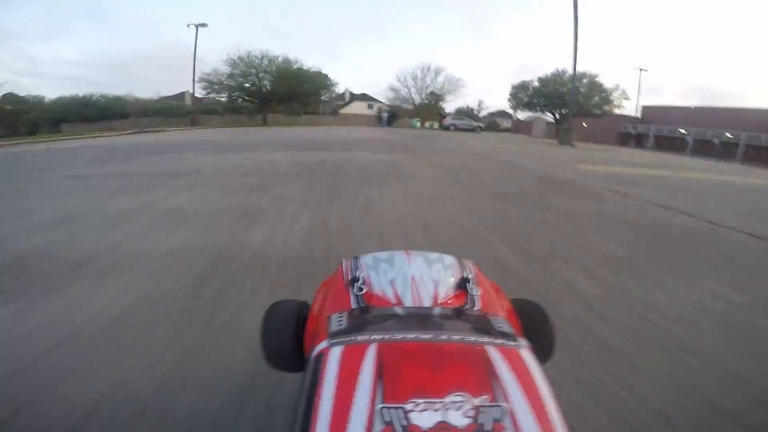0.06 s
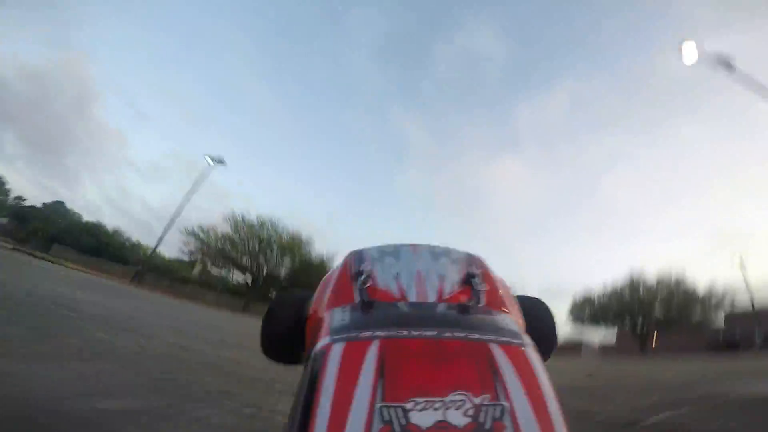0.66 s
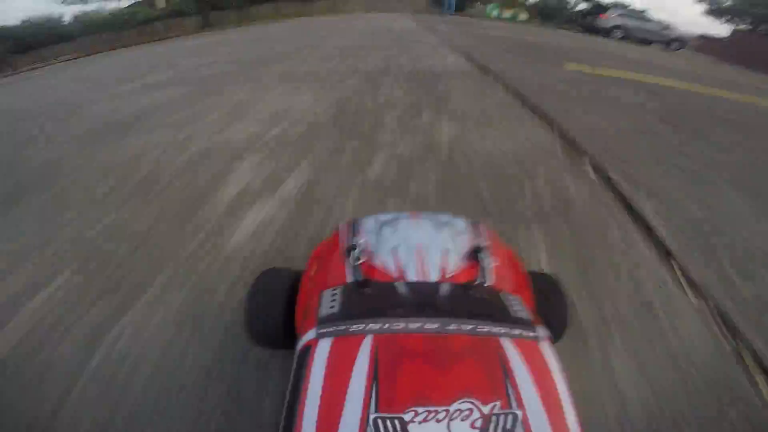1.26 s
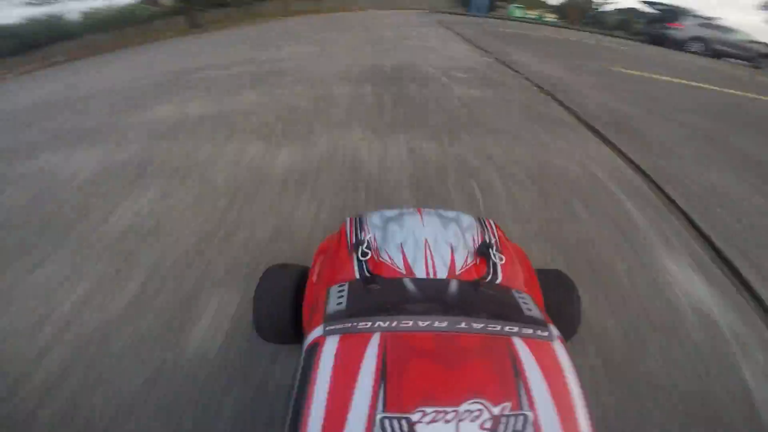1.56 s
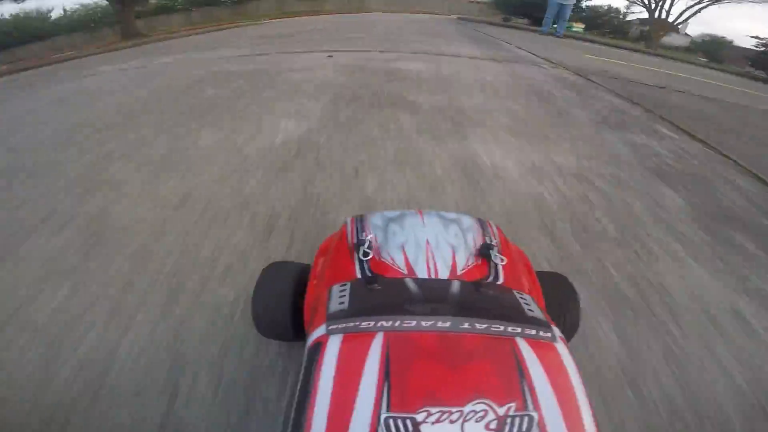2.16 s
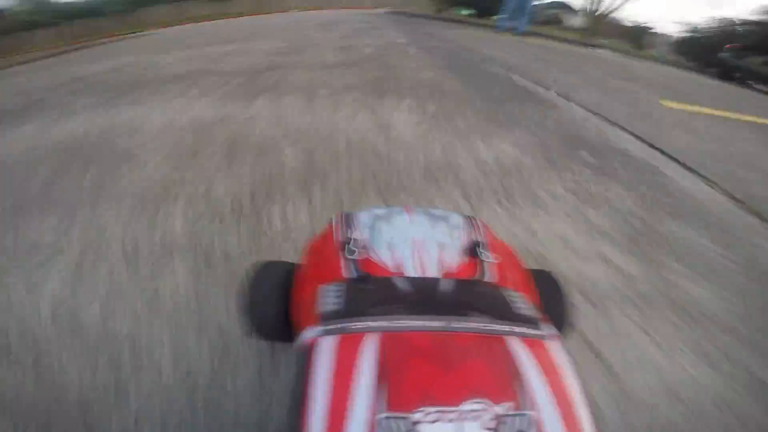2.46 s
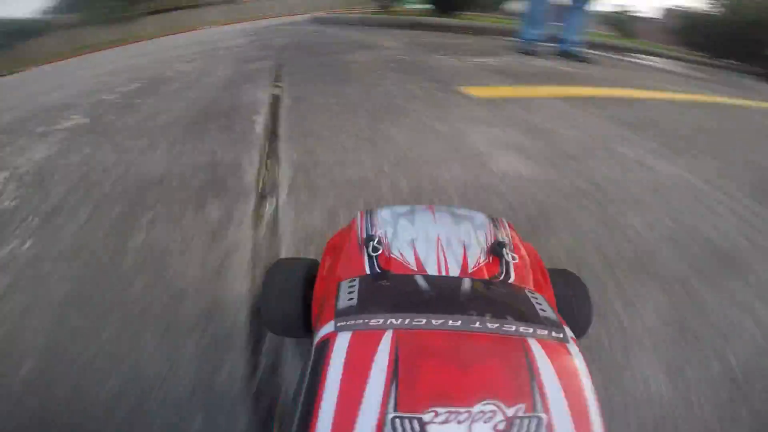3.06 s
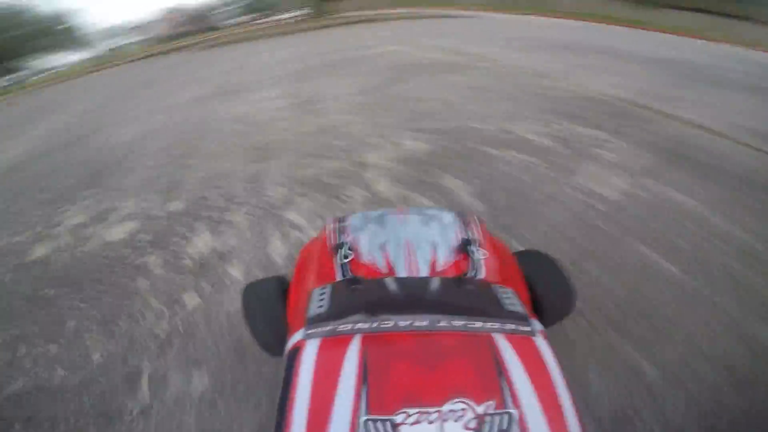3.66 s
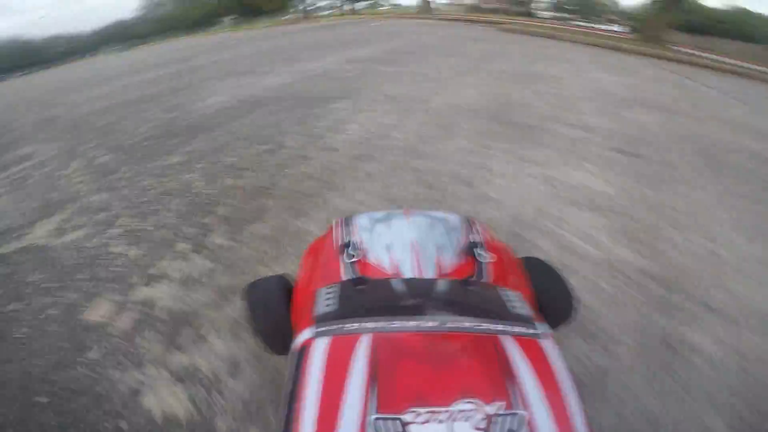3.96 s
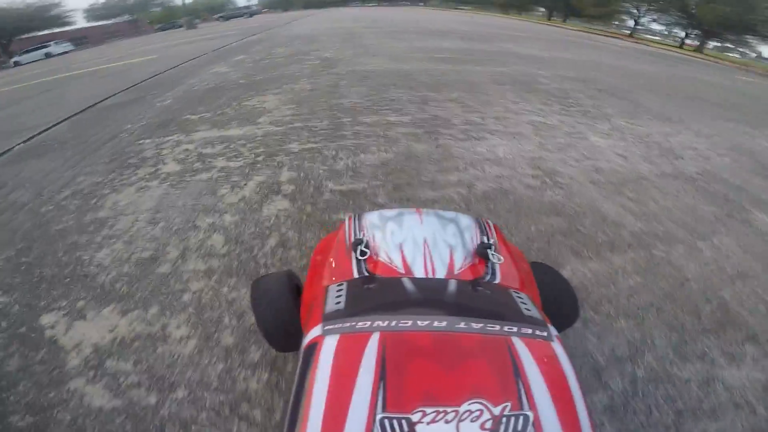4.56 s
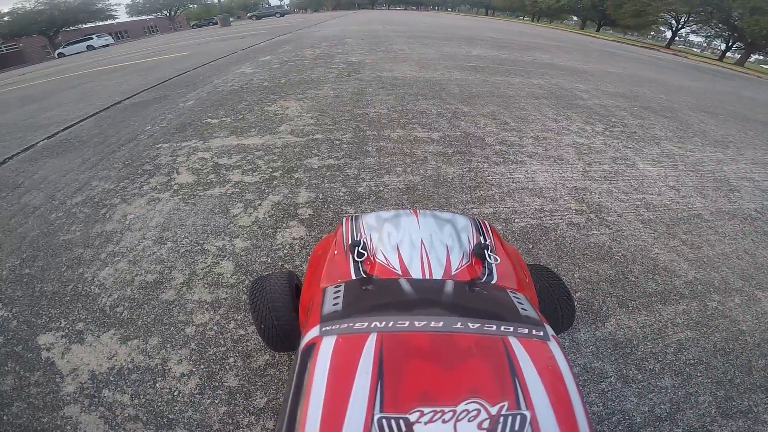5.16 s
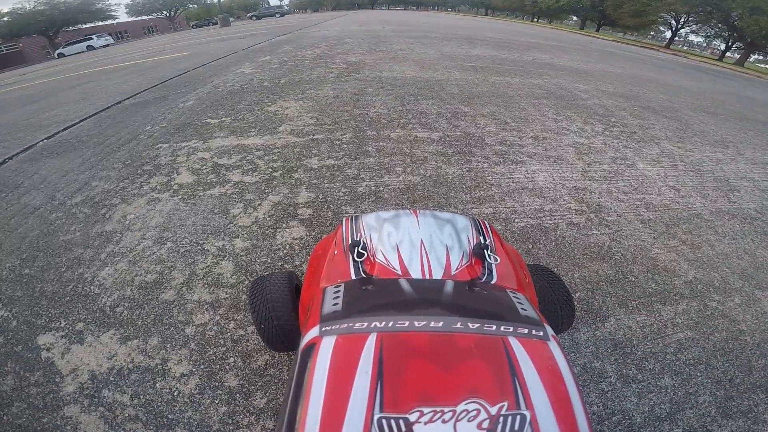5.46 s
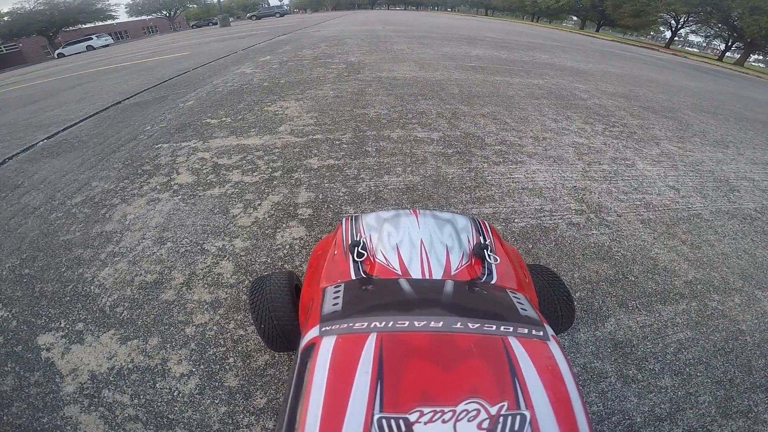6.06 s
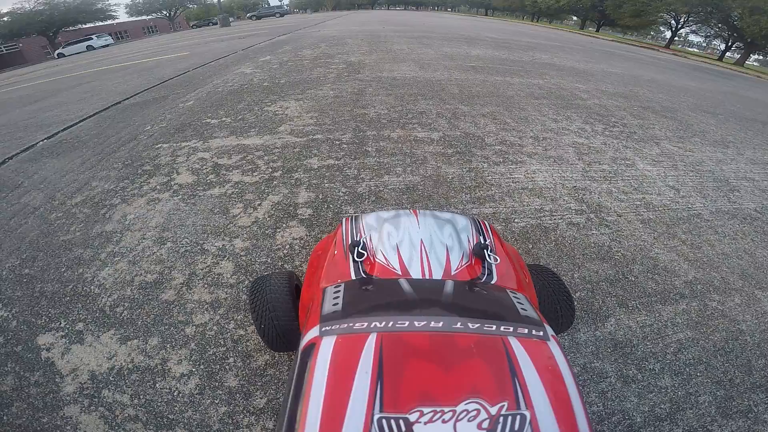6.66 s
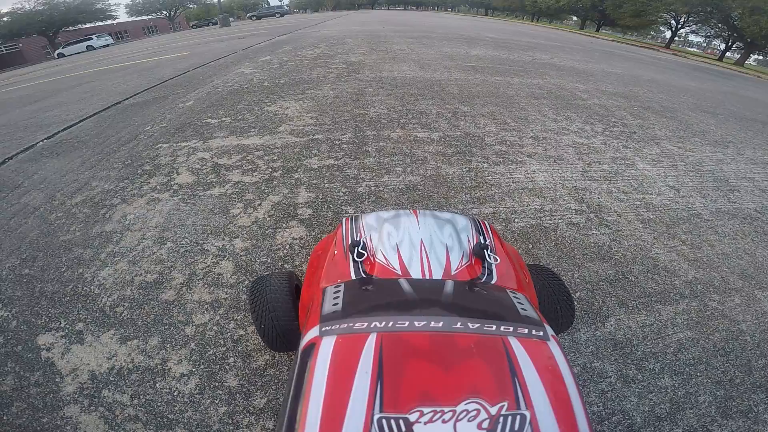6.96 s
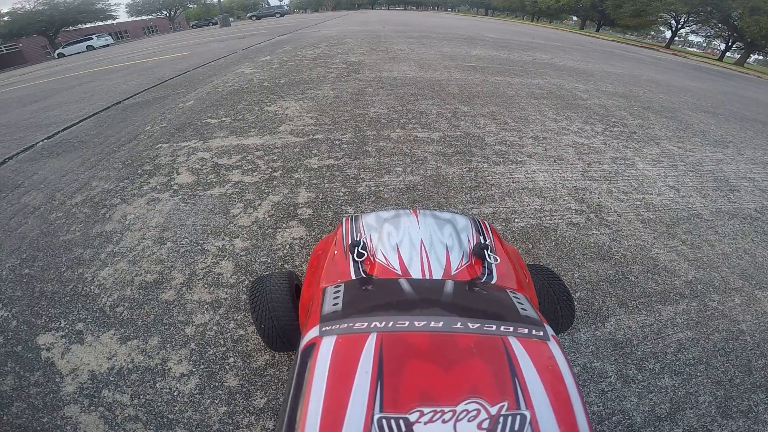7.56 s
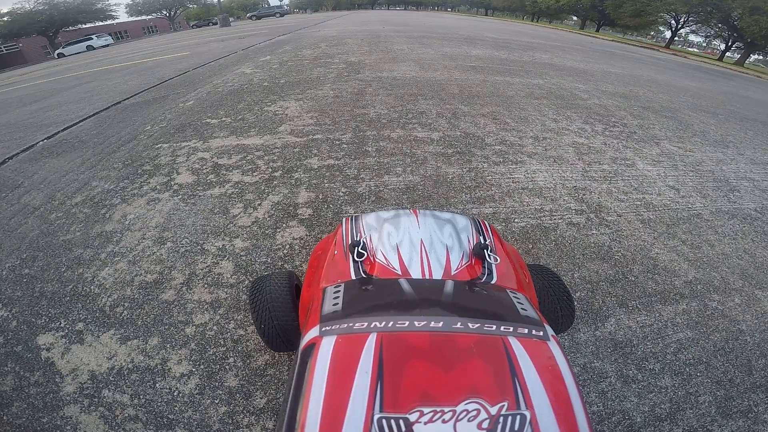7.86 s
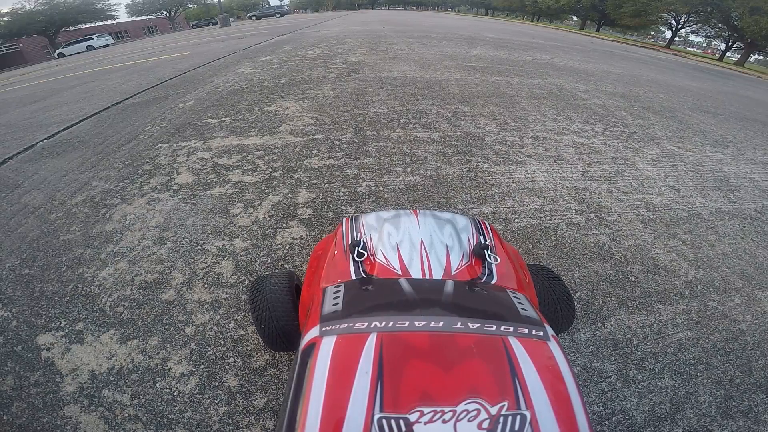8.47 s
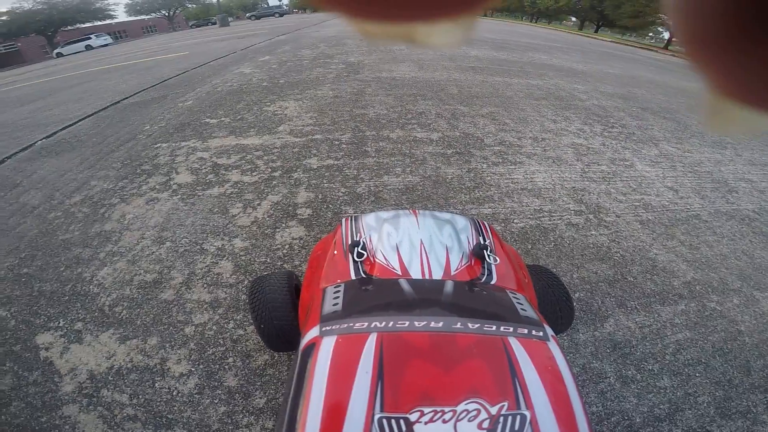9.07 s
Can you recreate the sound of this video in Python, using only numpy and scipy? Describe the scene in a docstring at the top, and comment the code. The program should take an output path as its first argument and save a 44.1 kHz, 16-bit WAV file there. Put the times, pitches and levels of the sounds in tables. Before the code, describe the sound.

A small electric radio-controlled truck is at full throttle on rough concrete, heard close from a microphone riding on it. Its gear whine surges to a peak around 0.4 seconds, with sharp clacks and a rattling plastic shell, and it lands with a thump at 0.9. The whine then falls steadily as the truck slows, over tyre rumble and a thin, steady electronic whistle. It judders around 2 seconds and thumps over paving joints, mostly between 2.5 and 3.8. The steering motor buzzes just after 4 seconds, and slack gears clack quickly from 4.4 until the truck stops at 5. After that it is much quieter: a small cooling fan sings a steady high tone over a faint steering buzz and soft air. From 9 to 9.3 seconds, fingers knock and rub against the microphone.

```python
"""A small electric truck revs into a wheelie on rough concrete, lands and slows to a halt.
Its gears whine and its loose parts rattle, both ringing the plastic shell. The ground shakes the
tyres and springs, and the speed controller whistles. The steering motor (servo) buzzes and, at rest,
the cooling fan sings. At the end a hand knocks against the camera that rides on the truck."""
import sys
import numpy as np
from scipy import signal
from scipy.fft import rfft, irfft, next_fast_len
from scipy.io import wavfile
from scipy.ndimage import map_coordinates

SR = 44100
rng = np.random.default_rng(int(sys.argv[2]) if len(sys.argv) > 2 else 0)


def unload_wav(signal):
    """Save mono or channel-first audio to the path in sys.argv[1] as 16-bit WAV at rate SR, clipped to [-1, 1]."""
    wavfile.write(
        sys.argv[1],
        SR,
        np.round(np.clip(np.atleast_2d(signal).T, -1, 1) * 32767).astype(np.int16),
    )


N = 410571
TIME = np.arange(N) / SR
CRUISE_HZ = 100  # a typical motor speed, in turns a second

# pitches at which the plastic shell rings: (pitch [Hz], width [Hz], level [dB])
SHELL = [(935.5, 280, -4.5), (1238, 370, -2.5), (1541, 140, -4.5), (1850, 217, -1), (2211, 408, 2.5),
         (2744, 420, -11.5), (3400, 42, -24), (3728, 200, -14), (4140, 570, -16.5), (5070, 170, -24),
         (5390, 400, -35), (6350, 640, -41), (7230, 310, -40), (7800, 610, -41), (8800, 280, -53),
         (9880, 680, -44), (11600, 1200, -65.5)]
# pitches at which the truck bounces on its springs: (pitch [Hz], width [Hz], level [dB])
SPRINGS = [(27.8, 27.6, -2.5), (61.7, 18.7, -1.5)]
# pitches at which the tyres boom: (pitch [Hz], width [Hz], level [dB])
TYRES = [(148, 47, -3.5), (181, 120, -5), (244.3, 49, 3), (385, 340, -14), (104, 24, -7.5)]

# stages of the run: (start [s], end [s], fade [s])
SPRINT = (-0.1, 0.29, 0.15)  # full throttle on all four wheels
WHEELIE = (0.32, 1, 0.16)  # nose in the air
TAIL_STAND = (0.438, 0.611, 0.039)  # upright, the tail drags on the ground


def amp(db):
    """Turn decibels into a gain, the number a sound is multiplied by."""
    return 10 ** (np.asarray(db) / 20)


def unit(x):
    """Scale a sound to an average strength (rms) of 1."""
    return x / np.sqrt(np.mean(x ** 2) + 1e-20)


def curves(rows):
    """Join a table's rows with straight lines: one curve for each column after the time."""
    times, *columns = np.transpose(rows)
    return [np.interp(TIME, times, column) for column in columns]


def wobble(rate):
    """A smooth random curve that takes `rate` new values a second."""
    return map_coordinates(rng.standard_normal(int(N * rate / SR) + 4), [TIME * rate])


def turns(hz):
    """The growing angle of something that spins hz times a second."""
    return 2 * np.pi * np.cumsum(hz) / SR


def tone(angle):
    """A pure tone with an average strength of 1."""
    return np.sqrt(2) * np.sin(angle)


def slopes(points):
    """A filter shape drawn through (pitch [Hz], level [dB]) points."""
    pitches, db = np.transpose(points)
    return lambda hz: amp(np.interp(np.log(hz + 1), np.log(pitches), db))


def body(modes):
    """The filter shape of an object: one peak for each pitch at which it rings."""
    return lambda hz: np.sqrt(sum((amp(db) / (1 + (2 * (hz - pitch) / width) ** 2)) ** 2
                                  for pitch, width, db in modes))


def colour(x, shape):
    """Filter a sound with the given shape, so that ringing follows each blow."""
    size = 2 * next_fast_len(len(x) // 2 + 4096)
    gain = np.maximum(shape(np.fft.rfftfreq(size, 1 / SR)), 1e-6)
    cepstrum = irfft(np.log(gain))
    cepstrum[1:size // 2] *= 2  # move all ringing to after the blow
    cepstrum[size // 2 + 1:] = 0
    return irfft(rfft(x, size) * np.exp(rfft(cepstrum)), size)[:len(x)]


def band(x, low_hz, high_hz):
    """Keep the part of a sound between two pitches."""
    edges = [low_hz, min(high_hz, 0.49 * SR)]
    return signal.sosfilt(signal.butter(5, edges, "band", fs=SR, output="sos"), x)


def noise(shape):
    """Steady noise filtered with the given shape."""
    return colour(rng.standard_normal(N), shape)


def burst(fade_s):
    """A short contact: noise that falls by 60 dB in fade_s."""
    t = np.arange(SR // 4) / SR
    return rng.standard_normal(len(t)) * amp(-60 * t / fade_s)


def push(rise_s):
    """One shove and its rebound."""
    progress = np.arange(SR // 4) / SR / rise_s
    return progress * (2 - progress) * np.exp(-progress)


def add(track, s, db, sound):
    """Lay a sound into the track at time s with the given peak level."""
    room = track[round(s * SR):][:len(sound)]
    room += amp(db) * sound[:len(room)] / np.abs(sound).max()


def during(start, end, fade):
    """1 inside a stage of the run, fading to 0 outside; times are in seconds."""
    return np.clip(np.minimum(TIME - start, end - TIME) / fade + 0.5, 0, 1)


def swell(s, db, half_length_s):
    """A gain that rises and falls once around time s."""
    return amp(db) * np.exp(-((TIME - s) / half_length_s) ** 2)


def rolling(speed, db, knee_hz, halving_db):
    """A gain that is steady at speed; well below knee_hz it loses halving_db as the speed halves."""
    return amp(db - halving_db * np.log2(np.hypot(1, knee_hz / (speed + 1e-3))))


def judder(speed, worst_hz=75, width_hz=6):
    """How hard the axles shake, from 0 to 1: they resonate around one motor speed."""
    return np.exp(-((speed - worst_hz) / width_hz) ** 2)


def gears(speed, shaft, wheel):
    """Teeth meet in a whine that rings the shell; slack and off-centre gears make it rough."""
    # force on the gear teeth: (time [s], level [dB])
    load = [(0, 7.5), (.25, 3.5), (.275, -5), (.55, 0), (.7, -8), (1.05, -6.5), (1.4, 0), (2.1, -3),
            (2.6, -6), (3.1, -2.5), (3.4, -4.5), (3.7, -8), (4.15, -1), (4.35, -7), (4.95, -44)]
    # tones of the pinion, the small gear at the axle: (cycles per motor turn, level [dB])
    pinion_tones = [(13, -21), (26, -24.5), (39, -25.5)]
    # tones of the spur gear, which the motor drives: (cycles per motor turn, level [dB])
    spur_tones = [(58, -20), (116, -31.5)]

    def whine(tones, angle):
        return sum(amp(db + 2.3 * wobble(45) + 2.2 * wobble(220)) * tone(round(cycles) * angle)
                   for cycles, db in tones)

    load_db, = curves(load)
    braking = during(3.22, 4.17, fade=0.2)  # the motor holds the truck back
    spur_db = load_db - 1 - 7 * during(*SPRINT) + 6 * braking + 4 * judder(speed)
    slack = 0.026 * wobble(60) + 0.008 * wobble(400)
    pinion_slack = slack + 0.016 * wobble(130)  # the pinion is the looser gear
    pinion = amp(load_db) * whine(pinion_tones, shaft + pinion_slack)
    pinion *= 1 + 0.14 * np.sin(2 * wheel) + 0.25 * np.sin(shaft)
    spur = amp(spur_db) * whine(spur_tones, shaft + slack) * (1 + 0.69 * np.sin(shaft))
    ringing = colour(pinion + spur, body(SHELL))
    return band(ringing, 830, 15000)  # a small shell hardly gives off low tones


def unbalance(speed, shaft, wheel):
    """Lopsided spinning parts hum through the springs and tyres, harder with speed."""
    doublings = np.log2((speed + 1e-3) / CRUISE_HZ)
    sprint, wheelie, shaking = during(*SPRINT), during(*WHEELIE), judder(speed)

    def hum(angle, db, doubling_db, sprint_db, wheelie_db, judder_db, waver_db):
        stage_db = sprint_db * sprint + wheelie_db * wheelie + judder_db * shaking
        return amp(db + doubling_db * doublings + stage_db + waver_db * wobble(25)) * tone(angle)

    rotor = hum(shaft, db=-46, doubling_db=12.5, sprint_db=-3.5, wheelie_db=9, judder_db=2, waver_db=3)
    wheels = hum(2 * wheel, db=-31, doubling_db=7,
                 sprint_db=7.5, wheelie_db=-5.5, judder_db=12, waver_db=3.5)
    joint = hum(2 * shaft + 0.15 * wobble(36), db=-31.5, doubling_db=7,  # it kicks twice a turn
                sprint_db=-0.5, wheelie_db=-14, judder_db=5, waver_db=0)
    return colour(rotor + wheels + joint, body(SPRINGS + TYRES))


def rattle(speed, wheel):
    """Many tiny hits ring the shell, bunched twice a wheel turn by the axle joints."""
    # noise bands of loose parts and tread: (low [Hz], high [Hz], level [dB], knee speed [turns/s],
    # loss per halving of speed [dB], change in sprint [dB], in wheelie [dB], in tail stand [dB])
    bands = [(710, 1694, -22, 6.4, 7.5, -4.5, -3, 5), (1621, 2530, -18.5, 21, 4.5, -2, -2, 1),
             (2508, 3440, -30, 17, 6.5, 1, 1.5, 8), (3477, 5900, -33.5, 26.3, 9, 6, -2, 2),
             (5840, 12700, -46.5, 42, 11.5, 4, -1.5, -0.5)]
    sprint, wheelie, tail = during(*SPRINT), during(*WHEELIE), during(*TAIL_STAND)
    depth = 0.11 + 0.46 * judder(speed)
    bunching = np.exp(depth * np.sin(2 * wheel)) / np.sqrt(np.i0(2 * depth))  # same average power
    uneven_db = 0.72 + 4 * np.exp(-speed / 22) + 1.2 * wheelie  # more uneven at a crawl
    strength = bunching * amp(uneven_db * wobble(90))
    hits_per_s = np.interp(speed, [10, 52], [700, 1900])
    hits = (rng.random(N) < hits_per_s / SR) * rng.choice([-1, 1], N)
    hits = hits * amp(rng.standard_normal(N)) / np.sqrt(hits_per_s)
    ringing = colour(strength * (unit(hits) + 0.67 * rng.standard_normal(N)), body(SHELL))
    parts = np.zeros(N)
    for low_hz, high_hz, db, knee_hz, halving_db, sprint_db, wheelie_db, tail_db in bands:
        stage = amp(sprint_db * sprint + wheelie_db * wheelie + tail_db * tail)
        parts += rolling(speed, db, knee_hz, halving_db) * stage * unit(band(ringing, low_hz, high_hz))
    # the rattle dips briefly as the wheels spin down before landing
    wheelie_lull = amp(-3.5 * during(0.68, 0.82, fade=0.31))
    return parts * wheelie_lull * rolling(speed, db=0.5, knee_hz=5.2, halving_db=9.5)


def chassis(speed):
    """Rough ground shakes the springs and tyres; joints in the paving thump them."""
    # wheels hit the joints: (time [s], spring peak [dB], tyre peak [dB])
    bumps = [(.239, -11.5, -5.5), (.59, -12.5, -11.5), (0.716, -17, -21), (0.897, -3, -13),
             (1.309, -8, -18), (1.345, -17, -22), (2.515, -7.5, -20), (2.552, -3.5, -15), (2.871, -12, -21),
             (3.059, -15, -16.5), (3.125, -14, -31.5), (3.191, -21, -14), (3.652, -6.5, -14.5),
             (3.76, -8.5, -18.5)]

    def lagging(gain, lag_s=0.05):  # the shaking lags behind the speed
        keep = np.exp(-1 / (lag_s * SR))
        return signal.lfilter([1 - keep], [1, -keep], gain, zi=[gain[0]])[0]

    def rumble(modes, top_hz):
        return unit(band(noise(body(modes)), 15.6, top_hz))

    spring_shake = lagging(rolling(speed, db=-22.5, knee_hz=17, halving_db=5.1))
    last_sway = swell(5.1, db=-38.5, half_length_s=0.17)  # it rocks once more at the halt
    springs = (spring_shake + last_sway) * rumble(SPRINGS, top_hz=400)
    tyres = lagging(rolling(speed, db=-32, knee_hz=5.8, halving_db=4.4)) * rumble(TYRES, top_hz=745)
    strain = amp(-27.5) * during(*SPRINT) + amp(-27) * during(*WHEELIE) + amp(-28) * during(*TAIL_STAND)
    drumming = strain * rumble(TYRES, top_hz=144.5)  # the rear tyres bear the whole truck
    thumps = np.zeros(N)
    for s, spring_db, tyre_db in bumps:
        add(thumps, s, spring_db, colour(push(rise_s=0.0017), body(SPRINGS)))
        add(thumps, s, tyre_db, band(colour(burst(fade_s=0.11), body(TYRES)), 60, 344))
    return springs + tyres + drumming + thumps


def controller(switch_hz=1008):
    """The speed controller switches the current on and off, so the motor's coils whistle."""
    # loudness of the whistle: (time [s], level [dB])
    throttle = [(0, -36), (.3, -39), (.8, -34), (1, -29), (3.2, -27.5), (4.2, -33), (4.6, -35.5),
                (4.85, -41), (5, -71)]
    # its tones: (multiple of the switching rate, relative level [dB])
    tones = [(2, 1), (3, -13.5), (4, -21)]
    level_db, = curves(throttle)
    angle = 2 * np.pi * switch_hz * TIME
    return sum(amp(level_db + db + 0.95 * wobble(24.57)) * tone(round(multiple) * angle)
               for multiple, db in tones)


def grit():
    """Grains of grit snap under the tyres."""
    # one row a grain: (time [s], relative level [dB])
    snaps = [(0.1854, -39), (0.5594, -40), (4.6254, -57), (4.7361, -52), (4.826, -38), (4.855, -38)]
    track = np.zeros(N)
    for s, db in snaps:
        add(track, s, db - 2.5, band(burst(fade_s=0.014), 4500, 12000))
    return track


def clacks(speed):
    """Slack gears knock as the load comes and goes, and each knock rings the shell."""
    # one row a knock: (time [s], relative level [dB])
    knocks = [(0.411, 0.5), (0.474, 2.5), (0.555, 1), (0.579, -3), (0.688, -5), (3.609, -20), (3.718, -15),
              (3.857, -20), (4.435, -5), (4.514, -2), (4.537, -11), (4.582, -5), (4.603, -23),
              (4.625, -11.5), (4.648, -3), (4.673, -6.5), (4.737, -3), (4.754, -15.5), (4.779, 1),
              (4.795, -13), (4.824, -11), (4.835, -9), (4.862, -10), (4.879, -13.5), (4.897, -6.5),
              (4.919, -8.5), (4.955, -19)]
    soften = slopes([(600, -6), (900, 1), (2300, 0), (3000, -4), (4000, -8), (9000, -13)])
    track = np.zeros(N)
    for s, db in knocks:
        spin = speed[round(s * SR)] / CRUISE_HZ
        blow = (0.14 + 0.15 * spin) * burst(0.018 + 0.018 * spin)  # teeth chatter more at speed
        blow[0] += 1  # the first hard contact
        add(track, s, db - 5, colour(blow, lambda hz: body(SHELL)(hz) * soften(hz)))
    return track


def servo(twitch_hz=62.43):
    """The steering servo twitches at each control pulse: a buzz, louder while it steers."""
    # pitches at which its case rings: (pitch [Hz], width [Hz], level [dB])
    case_modes = [(60, 50, -6.5), (132, 36, -8.5), (228, 150, -14), (1510, 340, -17.5), (1857, 260, -10.5),
                  (2203, 172, 4), (2565, 290, -11.5), (2840, 190, -14), (3730, 230, -28)]
    ticks = np.diff(np.floor(TIME * twitch_hz), prepend=0) * amp(0.7 * wobble(60))
    # the steady buzz comes up as the camera's gain recovers after the halt: (time [s], level [dB])
    heard_db, = curves([(5, -54.5), (5.3, -45), (9.3, -44)])
    steering = amp(-28) * during(4.05, 4.6, fade=0.1)  # it works against the tyres
    return (amp(heard_db) + steering) * unit(colour(ticks, body(case_modes)))


def scuffs():
    """Gritty scrapes on the concrete: the tyres scrub to a halt, later a faint scuff nearby."""
    # one row a scrape: (time [s], level [dB], half length [s])
    scrapes = [(4.886, -55, 0.057), (8.53, -55, 0.04)]
    hiss = unit(noise(body([(4500, 1900, 7), (8000, 4000, -13)])))
    return sum(swell(*scrape) for scrape in scrapes) * hiss


def fan():
    """A small three-bladed cooling fan sings over its own rush of air."""
    # how loud the steady fan is heard; it comes up as the camera's automatic gain recovers after
    # the halt: (time [s], blade level [dB], hub hum level [dB])
    heard_levels = [(0, -54, -50.5), (3.6, -46.5, -49.5), (4.4, -46, -41), (5, -44.5, -44), (5.4, -39, -50),
                    (8.05, -38.5, -55.5), (8.5, -38, -46.5), (9.3, -38.5, -50.5)]
    # how fast it spins: (time [s], speed [turns/s])
    fan_speed = [(5.2, 386.6), (5.8, 385.9), (8, 385.8), (8.6, 384.6)]
    # tones of the blades: (cycles per fan turn, relative level [dB])
    blade_tones = [(2, -15), (3, -0.5), (4, -25.5), (5, -11), (6, -35), (7, -32.5), (10, -34), (11, -42),
                   (12, -27), (13, -38), (14, -48), (18, -43)]
    # air through the fan and the open lot: (pitch [Hz], level [dB])
    air_shape = [(25, 1), (60, 6), (100, -10), (250, -10), (600, -20), (900, -1.5), (1300, -12),
                 (2250, -1.5), (3250, -21), (3900, -16), (5100, -21.5), (5700, -25.5), (10000, -35),
                 (15000, -40.5)]
    blade_db, hub_db = curves(heard_levels)
    angle = turns(curves(fan_speed)[0] + 0.11 * wobble(12))
    blades = sum(amp(blade_db + db + 0.28 * wobble(12)) * tone(round(cycles) * angle)
                 for cycles, db in blade_tones)
    air = amp(blade_db - 10.5) * unit(noise(slopes(air_shape)))
    return blades + amp(hub_db) * tone(angle) + air


def handling():
    """Fingers bump the camera, rub over it and rock it on the truck's springs."""
    # bumps: (time [s], relative click level [dB], relative thump level [dB], rise of the shove [s])
    touches = [(9.009, -11.5, -3, 0.0041), (9.057, -17, -13.5, 0.0062), (9.1, -26, -37, 0.0043),
               (9.168, -23.5, -21.5, 0.012), (9.242, -24.5, -18.5, 0.0072)]
    # sliding fingers: (time [s], level [dB], half length [s])
    rubs = [(9.062, -39, 0.045), (9.158, -37.5, 0.018), (9.292, -44.5, 0.047)]
    # how the camera's housing colours a click: (pitch [Hz], level [dB])
    housing = [(100, 1), (220, 2), (350, -3), (600, -11), (1100, -0.5), (2100, -2.5), (3300, -13.5),
               (4200, -11), (6000, -22.5), (10000, -35), (12000, -45), (15000, -38.5)]
    skin = slopes([(110, 6.5), (220, 2), (550, -15), (2200, -16.5),
                   (5000, -27), (10000, -36), (15000, -39)])
    thud = slopes([(90, 0.5), (220, -6.5), (600, -1), (2000, -55)])
    rocking = body([(24.2, 8.6, 0)])
    track = sum(swell(*rub) for rub in rubs) * unit(noise(skin))
    for s, click_db, thump_db, rise_s in touches:
        add(track, s, click_db - 1, colour(burst(fade_s=0.023), slopes(housing)))
        add(track, s, thump_db + 0.5, colour(push(rise_s), thud))
        add(track, s, thump_db - 11.5, colour(push(rise_s), rocking))
    return track


def scene():
    """The microphone rides on the truck; the motor's speed drives all that rolls."""
    # how fast the motor spins: (time [s], speed [turns/s])
    motor_speed = [(0, 157), (.08, 184), (.145, 185), (.185, 172), (.21, 181), (.26, 184), (.36, 261),
                   (.46, 257), (.68, 170), (.85, 120), (1.5, 94.3), (2.1, 76.3), (2.7, 60), (3.3, 46),
                   (3.5, 38.3), (3.61, 31.2), (3.86, 22.3), (3.96, 21.7), (4.1, 17.6), (4.18, 17), (4.6, 9),
                   (4.97, 0)]
    speed, = curves(motor_speed)
    shaft = turns(speed)
    wheel = shaft * 13 / 38  # the gears turn the wheels more slowly
    spinning = gears(speed, shaft, wheel) + unbalance(speed, shaft, wheel)
    shaking = rattle(speed, wheel) + chassis(speed) + clacks(speed) + grit()
    electrics = controller() + fan() + servo()
    return (spinning + shaking + electrics + scuffs() + handling())[None]


def record(dry, top_hz=15300):
    """The camera rounds off the highest peaks and keeps nothing above top_hz."""
    rounded = dry / (1 + dry ** 8) ** (1 / 8)
    return irfft(rfft(rounded) * (np.fft.rfftfreq(N, 1 / SR) < top_hz), N)


dry = scene()
out = record(dry)
unload_wav(out)
```